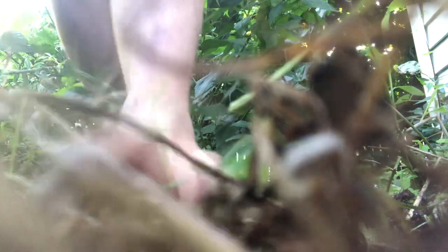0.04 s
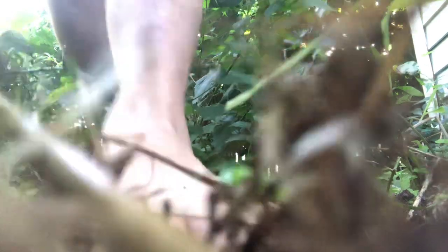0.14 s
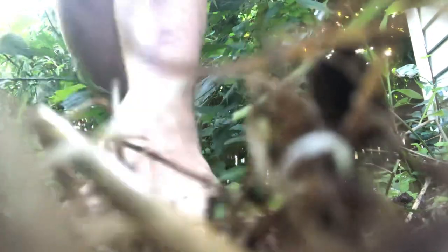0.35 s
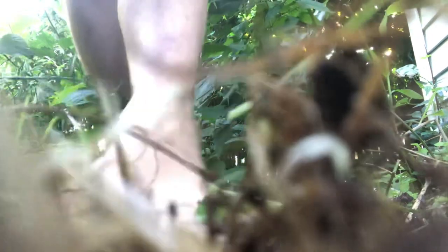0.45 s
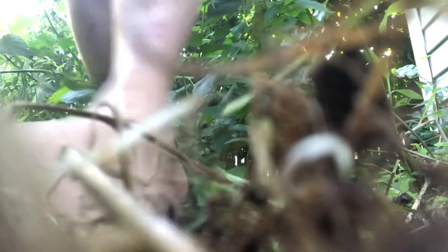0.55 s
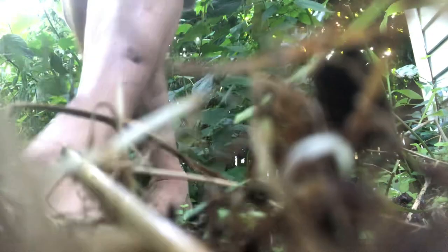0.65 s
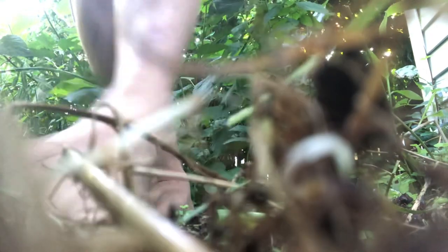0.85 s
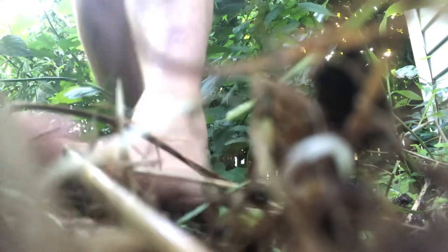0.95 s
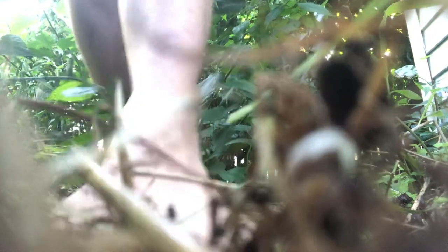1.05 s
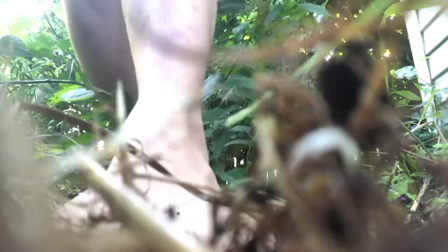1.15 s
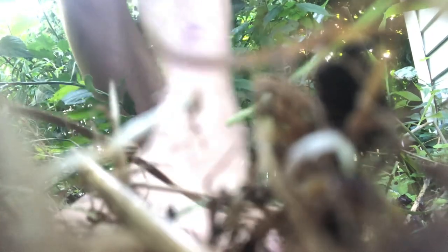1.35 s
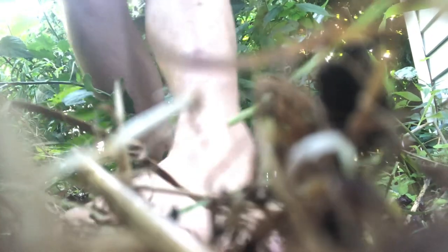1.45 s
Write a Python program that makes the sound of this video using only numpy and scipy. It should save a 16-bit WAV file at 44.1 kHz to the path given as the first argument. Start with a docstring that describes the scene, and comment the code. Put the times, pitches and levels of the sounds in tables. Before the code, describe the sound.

Bare feet shift on twigs and dry leaves close by, with soft crunches, ticks and faint thuds. At about 0.2 seconds a stick knocks on the microphone, hollow and by far the loudest moment. Stems rub against it at the start and around 0.5 seconds, where the crunching swells; lighter crackles return around 1 and 1.4 seconds. Throughout, a high cricket pulses quickly over distant insects and a faint low rumble.

```python
"""Outdoors, on ground strewn with twigs and dry plant litter, bare feet shift beside a microphone.
The litter crunches, twigs tick, leaves crack and brush the skin, and the soles thud softly.
Sticks knock and stems rub against the microphone's housing, which rings as they stick and slip.
Behind them a cricket trills with its wings in a chorus of far insects, over air and a low rumble."""
import sys
import numpy as np
from scipy import signal
from scipy.fft import rfft, irfft, next_fast_len
from scipy.io import wavfile

SR = 44100
rng = np.random.default_rng(int(sys.argv[2]) if len(sys.argv) > 2 else 0)


def wav_out(sig):
    """Save sig, one row per channel (or a flat mono array), as 16-bit PCM at SR to the path in sys.argv[1]."""
    wavfile.write(sys.argv[1], SR, np.round(np.clip(np.atleast_2d(sig).T, -1, 1) * 32767).astype(np.int16))


N = 66150
T = np.arange(N) / SR


def from_db(db):
    """Decibels to gain."""
    return 10 ** (np.asarray(db) / 20)


def rms_one(x):
    """Scale to rms 1."""
    return x / np.sqrt(np.mean(x ** 2) + 1e-20)


def peak_one(x):
    """Scale to peak 1."""
    return x / (np.abs(x).max() + 1e-20)


def coloured(x, points, lag_ms=0):
    """Causal EQ through (Hz, dB) points; lag_ms delays 1 kHz, and lows more, like a stick's bending wave."""
    size = 2 * next_fast_len(len(x))
    hz = np.abs(np.fft.fftfreq(size, 1 / SR))
    point_hz, point_db = np.transpose(points)
    log_gain = np.log(from_db(np.interp(np.log(hz + 1), np.log(point_hz), point_db)))
    response = np.exp(np.conj(signal.hilbert(log_gain)))  # minimum phase
    bending = np.exp(-4j * np.pi * lag_ms * np.sqrt(hz / 1000))
    return irfft(rfft(x, size) * (response * bending)[:size // 2 + 1], size)[:len(x)]


def shifted(points, ratio):
    """The same colour, higher or lower in pitch."""
    return np.array(points) * [ratio, 1]


def noise_bed(colour):
    """Steady coloured noise at rms 1."""
    return rms_one(coloured(rng.standard_normal(N), colour))


def drift(rate_hz):
    """Smooth random wander at rms 1."""
    pole = np.exp(-2 * np.pi * rate_hz / SR)
    return rms_one(signal.lfilter([1], [1, -2 * pole, pole * pole], rng.standard_normal(2 * N))[N:])


def grains(per_s, spread_db):
    """Random clicks, many small and a few large."""
    sizes = from_db(spread_db * np.minimum(rng.exponential(1, N), 4.5))
    signs = rng.choice([-1, 1], N)
    return sizes * signs * (rng.random(N) < per_s / SR)


def envelope(t, attack_s, hold_s, release_s):
    """Straight rise, hold, exponential fall."""
    return np.clip(t / attack_s, 0, 1) * np.exp(-np.maximum(t - attack_s - hold_s, 0) / release_s)


def add(out, start_s, sound):
    """Mix a short sound in at its start time."""
    i = int(np.clip(round(start_s * SR), 0, N - 1))
    out[i:i + len(sound)] += sound[:N - i]


def insect_chorus():
    """Far insects merge into one high, shimmering band."""
    # colour of the chorus (frequency [Hz], level [dB])
    colour = [(3800, -50), (4600, -24), (5200, -9.5), (5420, -7.5), (5570, 0.5), (5850, -0.5), (6050, -2.5),
              (6230, -12.5), (6420, 0), (6750, -9.5), (7100, -15), (7600, -23), (8600, -37)]
    level_db, flicker_db = -48, 1.2
    return from_db(level_db + flicker_db * drift(rate_hz=55)) * noise_bed(colour)


def outdoor_air():
    """A steady, dark bed of open air."""
    # colour of the air (frequency [Hz], level [dB])
    colour = [(20, -34), (60, -13.5), (105, -5), (150, -10), (200, -6), (250, -4), (330, -15.5),
              (480, -19.5), (900, -21.5), (1250, -28.5), (2200, -41), (3800, -47), (9000, -43),
              (15500, -44)]
    return from_db(-49.5) * noise_bed(colour)


def rumble():
    """A distant low rumble whose level dips briefly."""
    # colour of the rumble (frequency [Hz], level [dB])
    colour = [(20, -45), (44, -16.5), (57, 2.5), (72, -4.5), (100, -9), (160, -30.5), (600, -70)]
    # fader curve of the rumble (time [s], level [dB])
    levels = [(0, -48.5), (.37, -52.5), (.42, -62), (.54, -61), (.6, -52), (1.5, -51.5)]
    return from_db(np.interp(T, *np.transpose(levels))) * noise_bed(colour)


def litter_crunch():
    """Dense tiny fractures run through the litter as the weight shifts."""
    # swells of the crunch underfoot (time [s], level [dB])
    swells = [(0, -50.5), (.062, -52), (.125, -60.5), (.175, -56), (.25, -57), (.30, -65), (.405, -57),
              (.48, -45.5), (.545, -48.5), (.595, -57.5), (.66, -53), (.73, -66), (.925, -61.5),
              (.955, -54.5), (1.035, -58.5), (1.065, -48.5), (1.13, -66), (1.26, -65.5), (1.31, -55),
              (1.39, -57), (1.445, -64), (1.5, -53.5)]
    # colour of the crunch (frequency [Hz], level [dB])
    colour = [(30, -23), (150, -2.5), (400, 2), (1200, 0.5), (2400, 1), (4000, -5), (7000, -6.5),
              (10000, -11), (15500, -14)]
    flicker_db = 2 * drift(rate_hz=54)
    level_db = np.interp(T, *np.transpose(swells)) + flicker_db
    fractures = grains(per_s=7000, spread_db=3.5)
    return from_db(level_db) * rms_one(coloured(fractures, colour))


def twig_ticks():
    """A thin twig ticks: one break and a trail of splintering fibres."""
    # twigs giving way (time [s], peak [dB], pitch [ratio])
    breaks = [(0.0085, -35, 2.4), (0.0268, -32.5, 2.2), (0.0965, -33, 1.17), (0.1760, -30.5, 0.86),
              (0.1880, -30, 0.97), (0.225, -37, 1.2), (0.5375, -33, 0.85), (0.6380, -36, 0.31),
              (0.7655, -36, 0.7), (1.2053, -38, 0.76), (1.3120, -38, 1.4), (1.3928, -34.5, 0.91),
              (1.4107, -35, 1.33)]
    # colour of a tick (frequency [Hz], level [dB])
    colour = [(200, -9), (900, -7), (1500, -3.5), (2300, -0.5), (3600, -8), (5000, -20.5), (9000, -17),
              (16000, -32)]
    splinter_gain, splinter_decay_s = 0.12, 0.00082
    out, t = np.zeros(N), T[:SR // 20]
    for start, db, pitch in breaks:
        splinters = splinter_gain * rng.standard_normal(len(t)) * np.exp(-t / splinter_decay_s)
        tick = coloured((t == 0) + splinters, shifted(colour, pitch), lag_ms=0.688)
        add(out, start, from_db(db) * peak_one(tick))
    return out


def cricket():
    """Each raspy wing stroke glides up to its pitch; the foliage scatters it into a short tail."""
    # wing strokes of the near cricket (time [s], level [dB])
    chirps = [(0.031, -43), (.125, -43), (.220, -44), (0.31, -38), (.403, -42.5), (.497, -49),
              (0.588, -46.5), (0.69, -41.5), (0.78, -40.5), (.874, -47), (.967, -46), (1.061, -48),
              (1.157, -44), (1.249, -44), (1.343, -46), (1.440, -42)]
    pitch_hz, glide_hz, glide_s = 5970, 381, 0.0077
    wobble_hz, rasp_depth, octave_db = 28, 0.25, -22.5
    echo_db, echo_decay_s = -4.5, 0.018
    out, t = np.zeros(N), T[:SR // 10]
    wobble, rasp = drift(rate_hz=180), drift(rate_hz=200)
    for start, db in chirps:
        hz = pitch_hz - glide_hz * np.exp(-t / glide_s) + wobble_hz * np.interp(start + t, T, wobble)
        phase = 2 * np.pi * np.cumsum(hz) / SR
        force = envelope(t, attack_s=0.012, hold_s=0.011, release_s=0.011)
        force *= 1 + rasp_depth * np.interp(start + t, T, rasp)
        stroke = force * (np.sin(phase) + from_db(octave_db) * np.sin(2 * phase))
        scatter = rng.standard_normal(len(t)) * np.exp(-t / echo_decay_s)
        paths = (t == 0) + from_db(echo_db) * scatter / np.linalg.norm(scatter)  # direct plus foliage
        add(out, start, from_db(db) * signal.fftconvolve(stroke, paths))
    return out


def stick_knocks():
    """Each tap travels along a stick, arrives as a quick falling 'tock' and leaves a short hollow ring."""
    # taps (time [s], peak [dB], bending-wave lag at 1 kHz [ms], pitch [ratio], ring re peak [dB])
    taps = [(0.0315, -20.5, 1.71, 0.87, -10.5), (0.21345, -1, 1.43, 1.015, -28),
            (0.9824, -28.5, 1.58, 0.79, -4)]
    # colour of a knock (frequency [Hz], level [dB])
    colour = [(60, -46), (190, -24), (330, -23.5), (480, -6.5), (620, 0.5), (900, -7.5), (1250, -17),
              (1620, -32), (2050, -24), (2620, -31.5), (2810, -44), (3050, -29.5), (4000, -38.5),
              (4600, -57), (9000, -65), (16000, -80)]
    ring_hz = 982
    out, t = np.zeros(N), T[:SR // 20]
    ring = envelope(t, attack_s=0.0031, hold_s=0, release_s=0.0031) * np.sin(2 * np.pi * ring_hz * t)
    for start, db, lag_ms, pitch, ring_db in taps:
        tock = coloured(signal.unit_impulse(len(t)), shifted(colour, pitch), lag_ms)
        add(out, start, from_db(db) * peak_one(tock))
        add(out, start + lag_ms / 1000, from_db(db + ring_db) * ring)
    return out


def stem_rubs():
    """Stems stick and slip against the microphone's housing and set it ringing."""
    # rubs on the housing (start [s], length [s], level [dB])
    rubs = [(0.046, 0.061, -40), (0.158, 0.045, -40), (0.225, 0.036, -53), (0.412, 0.065, -50.5),
            (0.478, 0.072, -38), (0.625, 0.029, -50), (0.996, 0.039, -48.5), (1.054, 0.027, -47.5),
            (1.304, .11, -62.5)]
    # resonances of the housing (frequency [Hz], level [dB], width [Hz])
    modes = [(611, 3.5, 132), (732, -3, 137), (946, -4, 120)]
    attack_s, release_s = 0.0075, 0.014
    pressure, housing = np.zeros(N), np.zeros(N)
    for start, length, db in rubs:
        pressure += from_db(db) * envelope(T - start, attack_s, length - attack_s, release_s)
    slips = grains(per_s=1500, spread_db=4)
    for k, (hz, db, width_hz) in enumerate(modes):
        radius, angle = np.exp(-np.pi * width_hz / SR), 2 * np.pi * hz / SR
        feedback = [1, -2 * radius * np.cos(angle), radius * radius]
        ring = signal.lfilter([0, (1 - radius) * np.sin(angle)], feedback, slips)
        housing += (-1) ** k * from_db(db) * ring  # neighbouring modes alternate in polarity
    return pressure * rms_one(housing)


def leaf_cracks():
    """Brittle leaves break in short bright bursts."""
    # dry leaves breaking (time [s], peak [dB], decay [s], pitch [ratio])
    cracks = [(0.052, -38, .0006, 0.39), (0.0552, -37, 0.018, 0.69), (0.1700, -41, 0.00074, 0.73),
              (0.1873, -31, 0.00086, 1.35), (0.19, -30, 0.006, 1.35), (0.2573, -42, .0006, 0.7),
              (0.2722, -38, .0007, 0.78), (0.3098, -47, .0005, .9), (0.4620, -41, .0006, .95),
              (0.6541, -37, .0005, 0.68), (0.7647, -43, 0.00045, 0.8), (1.0492, -34, 0.00043, 0.53),
              (1.0538, -39, .0006, 0.68), (1.0915, -37.5, 0.00032, 0.67), (1.119, -42, 0.00036, 0.84)]
    # colour of a crack (frequency [Hz], level [dB])
    colour = [(500, -13), (3000, -4), (7500, -12), (11000, -2), (13500, 3.5), (18000, -2)]
    out, t = np.zeros(N), T[:SR // 20]
    for start, db, decay_s, pitch in cracks:
        burst = rng.standard_normal(len(t)) * np.exp(-t / decay_s)
        add(out, start, from_db(db) * peak_one(coloured(burst, shifted(colour, pitch))))
    return out


def sole_thuds():
    """A sole settles on the earth with a few dull cycles."""
    # soft footfalls (time [s], level [dB], pitch [Hz])
    thuds = [(0.086, -43, 86), (0.234, -43, 60.4), (0.347, -45, 64), (0.949, -43, 57), (1.244, -41, 97)]
    out = np.zeros(N)
    for start, db, hz in thuds:
        t = T - start
        weight = envelope(t, attack_s=0.0089, hold_s=0, release_s=0.025)
        out += from_db(db) * weight * np.sin(2 * np.pi * hz * t)
    return out


def leaf_brushes():
    """Leaves slide over the foot with a fine hiss."""
    # strokes along the skin (start [s], length [s], level [dB], pitch [ratio])
    brushes = [(.44, 0.13, -57, 0.76), (0.567, 0.12, -58.5, 1.24), (0.934, 0.046, -50, .42),
               (1.0, 0.032, -56, .5), (1.351, 0.05, -60, 0.4)]
    # colour of the hiss (frequency [Hz], level [dB])
    colour = [(100, -42), (900, -17), (2600, -0.5), (5200, 3.5), (8000, -2), (15000, -6), (28000, -15)]
    attack_s, release_s = 0.011, 0.0072
    out, friction = np.zeros(N), grains(per_s=9700, spread_db=2.0)
    for start, length, db, pitch in brushes:
        contact = envelope(T - start, attack_s, length - attack_s, release_s)
        out += from_db(db) * contact * rms_one(coloured(friction, shifted(colour, pitch)))
    return out


def scene():
    """A mono mix: the feet up close, the insects and the open air behind."""
    feet = sole_thuds() + litter_crunch() + leaf_brushes()
    contacts = stem_rubs() + stick_knocks()
    snaps = twig_ticks() + leaf_cracks()
    ambience = cricket() + insect_chorus() + outdoor_air() + rumble()
    return (feet + contacts + snaps + ambience)[None]


def record(dry):
    """A steep low-pass takes off the very top."""
    cutoff_hz = 15750
    low_pass = signal.firwin(801, cutoff_hz, fs=SR, window=("kaiser", 8))
    return signal.fftconvolve(dry, low_pass[None], "same")


dry = scene()
out = record(dry)
wav_out(out)
```